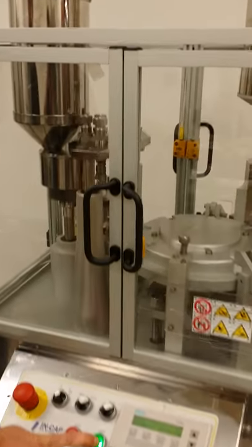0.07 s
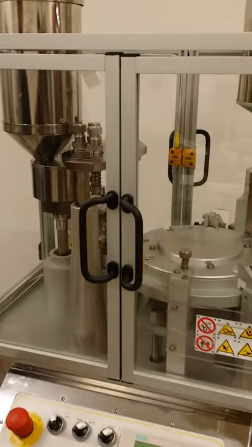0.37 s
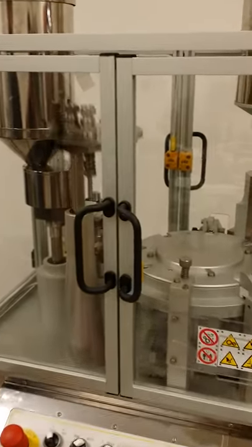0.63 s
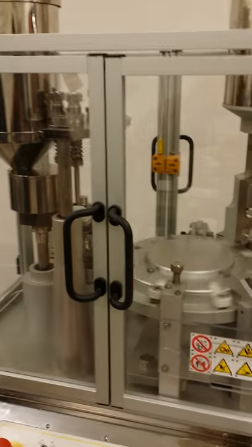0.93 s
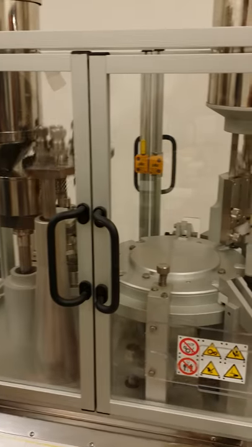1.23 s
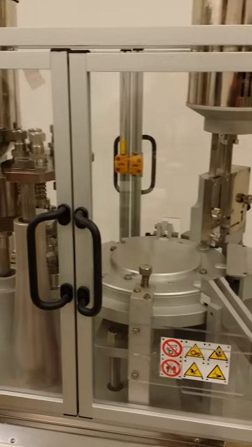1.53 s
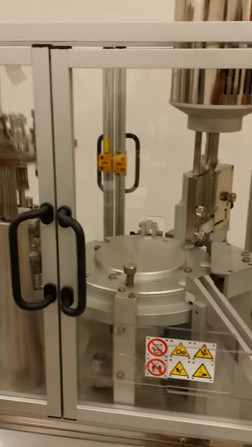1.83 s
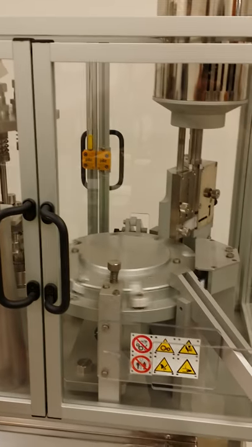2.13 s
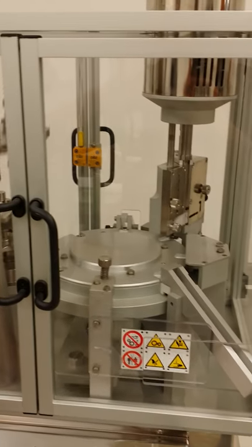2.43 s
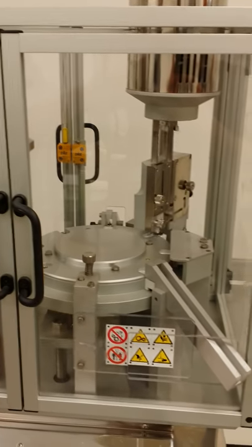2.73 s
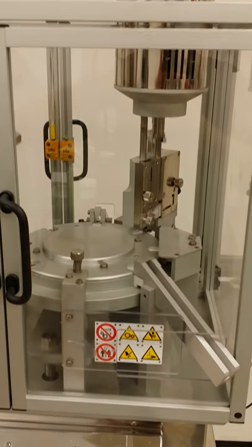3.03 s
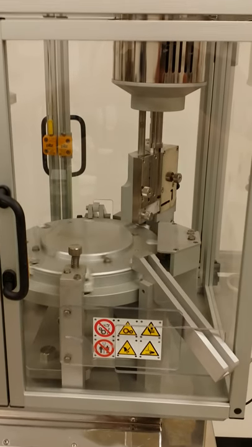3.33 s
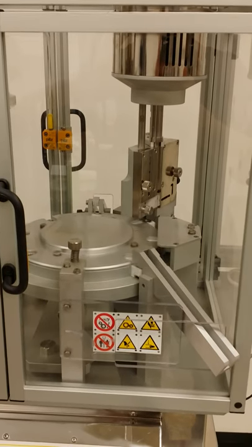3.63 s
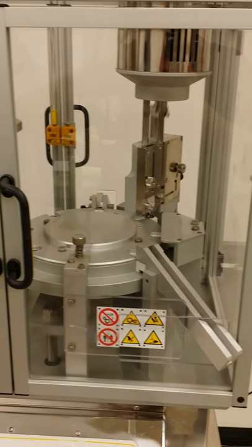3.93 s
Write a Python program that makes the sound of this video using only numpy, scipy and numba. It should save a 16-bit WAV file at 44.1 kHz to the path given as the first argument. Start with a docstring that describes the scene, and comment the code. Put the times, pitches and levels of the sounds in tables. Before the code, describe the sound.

A capsule filling machine runs close by in a workshop. Over a steady hum, rumble and airy hiss, it cycles three times: a metal clack and thump, a sharp air blast, then a puff, ticks and dull knocks.

```python
"""A capsule filling machine indexes every 1.29 s behind its doors, heard from close by in a workshop.
From the start a vacuum pump and motors hum, the cam drive rumbles and air lines hiss. In each cycle
metal clacks on a stop and the frame thumps; a valve lets out a sharp blast; a puff, a latch tick and
two knocks follow. The third blast, at 3 s, overloads the gain control, which backs off and creeps up."""
import sys
import numpy as np
from scipy import signal
from scipy.fft import rfft, irfft
from scipy.io import wavfile
from scipy.ndimage import uniform_filter1d, minimum_filter1d
from numba import njit

SR = 44100
rng = np.random.default_rng(int(sys.argv[2]) if len(sys.argv) > 2 else 0)


def output_pcm(signal):
    """Save a mono or channel-first signal as 16-bit PCM at the path in sys.argv[1].

    Samples are clipped to [-1, 1] before scaling.
    """
    pcm = np.clip(np.atleast_2d(signal).T, -1, 1) * 32767
    wavfile.write(sys.argv[1], SR, np.round(pcm).astype(np.int16))


N = 176400
HZ = np.arange(N // 2 + 1) * SR / N
TIME = np.arange(N) / SR
CYCLE_S, PUMP_HZ, MAINS_HZ = 1.287, 227.3, 59.52

# Harmonics of pump and motor: harmonic number, level/dB
PUMP_TONES = [(1, -38), (2, -46), (3, -36.5), (4, -45.5), (5, -47.5), (6, -63)]
MOTOR_TONES = [(3, -48.5), (6, -45), (14, -49)]
# Cam load, air flow, whistle and slide friction over one cycle: t/s, level/dB
LOAD_CYCLE = [(0.1, 1), (0.2, 1), (0.38, -4), (0.58, 3), (0.73, -3), (1.03, -4.5), (1.21, 0.5)]
FLOW_CYCLE = [(0.1, 2.5), (0.33, 4), (0.66, 0), (0.76, 1), (1.12, 1.8)]
WHISTLE_CYCLE = [(0.02, -0.5), (0.2, -22), (0.45, -5), (0.72, 1.5), (0.98, -1), (1.15, 0)]
RUB_CYCLE = [(0.0, 0), (0.08, 4.5), (0.17, -1), (0.27, -16), (0.5, -5), (1.1, -15), (1.21, -11.5)]
# Power spectral densities of the noises: f/Hz, level/dB in a 1 Hz band
DRIVE_PSD = [(38, -99), (52, -69), (85, -66.5), (120, -65), (200, -60.5), (400, -58.5), (580, -68.5),
             (850, -64.5), (1300, -66), (1800, -75), (3000, -80), (5200, -70), (8000, -91)]
RUB_PSD = [(1500, -79.5), (3200, -66.5), (4300, -73), (6000, -74.5), (7500, -74.5), (9500, -76.5)]
AIR_PSD = [(400, -76), (800, -69.5), (2000, -77), (3200, -77.5), (4500, -78.5), (7200, -71.5), (8600, -74),
           (10400, -67.5), (12200, -73.5), (13600, -64.5), (15300, -65)]
WHISTLE_PSD = [(1000, -96), (2700, -77), (3500, -75), (5500, -93), (9000, -86)]
KNOCK_PSD = [(60, -60), (190, -53.5), (500, -58.5), (1200, -50), (1700, -63), (2300, -56.5), (4000, -67.5),
             (9000, -78), (15000, -90)]
LATCH_PSD = [(400, -60), (1500, -63.5), (2300, -59.5), (5000, -60.5), (7000, -58), (15000, -58.5)]
CLACK_PSD = [(60, -62), (320, -47.5), (550, -63), (1100, -45.5), (1600, -65.5), (2800, -57.5),
             (4000, -53.5), (5200, -64), (7000, -53.5), (9000, -57), (10500, -62), (15000, -73)]
BLAST_PSD = [(300, -70), (1500, -60), (4000, -56), (6000, -54.5), (8700, -48), (10500, -45.5),
             (13000, -45.5), (15300, -47)]
EXHAUST_PSD = [(150, -75.5), (1500, -58.5), (3500, -63), (12000, -64.5), (15000, -63)]
PUFF_PSD = [(150, -104), (800, -57.5), (2000, -68), (9000, -64), (15000, -66)]
# Resonances in those spectra: f/Hz, width/Hz, lift/dB
DRIVE_PEAKS = [(173, 24, 11), (322, 6.1, 2.1)]
RUB_PEAKS = [(5200, 190, 5.1)]
AIR_PEAKS = [(7570, 240, 6.1), (9440, 200, 16.7)]
WHISTLE_PEAKS = [(3550, 180, 12.8)]
CLACK_PEAKS = [(1227, 180, 9.2), (1890, 600, 16), (4260, 210, 9.2), (8500, 540, 10.3)]
BLAST_PEAKS = [(7360, 820, 12.5), (11400, 960, 10), (15000, 460, 11.3)]
# Normal modes of frame, metal stop and valve body: f/Hz, level/dB, T60/s
FRAME_PARTIALS = [(129.4, -23.5, 0.16), (181.3, -19.5, 0.19), (251.5, -23, 0.1), (315.5, -17.5, 0.16),
                  (392, -24, 0.17)]
STOP_PARTIALS = [(981, -24, 0.29), (1221, -25.5, 0.11), (1883, -26, 0.25), (2020, -39, 0.2),
                 (2460, -21, 0.11)]
VALVE_PARTIALS = [(7267, -17.5, 0.27), (12000, -36, 0.067), (15130, -13, 0.16)]
# Knocks, clacks and puffs: t/s, level/dB
KNOCK_EVENTS = [(0.098, -3.5), (0.422, -0.5), (1.188, 1.5), (1.385, -6.5), (1.705, -5), (2.474, -1.5),
                (2.672, -12), (2.992, 3.5), (3.758, 0)]
CLACK_EVENTS = [(0.394, -3), (1.678, -1.5), (2.966, -1)]
PUFF_EVENTS = [(0.588, 2.5), (1.876, 3.5), (3.165, -2.5)]
# Latch ticks and their pitch: t/s, level/dB, f/Hz
LATCH_EVENTS = [(0.499, -3, 3130), (0.68, -0.5, 2600), (1.78, -2, 4150), (1.965, 0, 2790), (3.25, 1, 2440)]
# Frame thumps and air blasts: t/s, level/dB, spectral tilt/(dB per octave)
THUMP_EVENTS = [(0.03, -3, 1), (0.41, -2, 5), (0.483, 0, -3), (0.612, -0.5, -3), (1.061, -1.5, -4),
                (1.188, -4, -5), (1.697, -4.5, 8), (1.775, -3.5, 4), (1.891, -3, -1.5), (2.334, -3, -1),
                (2.477, -1, -5), (2.676, -3.5, -7), (2.981, 0, 3), (3.635, -5, 1)]
BLAST_EVENTS = [(0.451, -1.5, -5.5), (1.7374, -5, -1.5), (3.031, 1, 3.5)]
# Likeness of the two microphone ports: f/Hz, correlation (capped at 1 in use)
PORT_CORRELATION = [(125, 0.5), (260, 1.1), (520, 0.5), (1000, -0.36), (4000, -0.02)]
# Response of the weaker left port: f/Hz, level/dB
LEFT_RESPONSE = [(60, -4), (250, -4), (680, -5.5), (1200, -5.5), (2200, -4.5), (4500, -2), (6400, 0.5),
                 (7600, -8), (9400, -13.5), (11500, -12.5), (14500, -9.5)]


def undb(db):
    """Amplitude ratio of a level in decibels."""
    return 10 ** (np.asarray(db) / 20)


def on_freqs(points):
    """A curve interpolated over log frequency at every bin."""
    hz, value = np.array(points, float).T
    return np.interp(np.log(HZ + 1e-9), np.log(hz), value)


def on_cycle(points):
    """A curve periodic in the machine's cycle."""
    return np.interp(TIME, *np.array(points, float).T, period=CYCLE_S)


def wander(position):
    """Gaussian fluctuation with a new value at each whole step of position."""
    return np.interp(position, np.arange(8192), rng.standard_normal(8192))


def noise(spectrum, peaks=()):
    """Coloured noise; the ratio of sum to difference signal sets the correlation of the ports."""
    lift = 1 + sum((undb(db) ** 2 - 1) / (1 + (2 * (HZ - hz) / width) ** 2) ** 2
                   for hz, width, db in peaks)
    mid, side = rng.standard_normal((2, 2 * len(HZ))).view(complex)
    alike = np.clip(on_freqs(PORT_CORRELATION), -1, 1)
    ports = mid * np.sqrt(1 + alike) + side * np.sqrt(1 - alike) * np.array([[1], [-1]])
    return irfft(ports * undb(on_freqs(spectrum)) * np.sqrt(np.abs(lift) * SR * N / 2) / 2, N)


def bursts(events, attack_s, hold_s, t60_s, room_db, room_t60_s):
    """Envelope of incoherent events: direct sound and reverberant tail add in power."""
    age, power = TIME[:SR // 2], np.zeros(N + SR)
    decay = -2 * np.log(1000) * np.maximum(age - attack_s - hold_s, 0)
    tail = undb(room_db) ** 2 * np.exp(decay / room_t60_s)
    shape = np.clip(age / attack_s, 0, 1) ** 2 * (np.exp(decay / t60_s) + tail)
    for start, db in events:
        power[int(start * SR):][:len(age)] += undb(db) ** 2 * shape
    return np.sqrt(power[:N])


def ring(partials, attack_s=0.0005):
    """Damped free vibration of modes (t/s, f/Hz, level/dB, T60/s), out of step at the two ports."""
    age, out = TIME[:SR // 2], np.zeros((2, N + SR))
    for start, hz, db, t60_s in partials:
        detune, phase, lag = rng.standard_normal(3) * (.008, 1, .0002)
        turns = hz * (1 + detune) * (age - np.array([[lag], [0]])) + phase
        shape = np.minimum(age / attack_s, 1) * np.exp(-np.log(1000) * age / t60_s)
        out[:, int(start * SR):][:, :len(age)] += undb(db) * shape * np.sin(2 * np.pi * turns)
    return out[:, :N]


def chatter(rate_hz, depth_db):
    """Random amplitude modulation at unit mean power, as of uneven contact."""
    gain = undb(depth_db * wander(TIME * rate_hz))
    return gain / np.sqrt(np.mean(gain ** 2))


def hum(base_hz, tones, lag_s):
    """Rotation at a slightly wandering speed gives a harmonic series, delayed at the left port."""
    turns = np.cumsum(base_hz * (1 + 0.0018 * wander(TIME * 5))) / SR
    tone = np.sqrt(2) * sum(
        undb(db + 1.7 * wander(TIME * 12)) * np.sin(2 * np.pi * (k * turns + rng.random()))
        for k, db in tones)
    return np.array([np.interp(TIME - lag_s, TIME, tone), tone])


def motors():
    """Mains hum; two motors at slightly different speeds interfere, so its lowest tone beats."""
    period_s, dip_s, second_motor_db = 0.638, 0.652, -4
    beat = np.abs(1 - undb(second_motor_db) * np.exp(2j * np.pi * (TIME - dip_s) / period_s))
    return hum(MAINS_HZ, MOTOR_TONES, lag_s=0.00033) + beat * hum(2 * MAINS_HZ, [(1, -42)], lag_s=0)


def cabinet(sound):
    """Dense weak resonances of panes and frame ripple the spectrum of the noises inside."""
    steps = HZ / 26  # one ripple value every 26 Hz
    ripple = np.array([wander(steps) + .55 * wander(steps / 4) for _ in range(2)])
    depth_db = 2.1 * on_freqs([(300, 0.99), (1000, 1.02), (5000, 1.94), (12000, 0.085)])
    return irfft(rfft(sound) * undb(depth_db * (ripple - 0.71)), N)


def cam_drive():
    """Forced vibration: cams and bearings shake the frame as the load rises; the slides rub."""
    rumble = noise(DRIVE_PSD, DRIVE_PEAKS) * undb(on_cycle(LOAD_CYCLE)) * chatter(100, 2.0)
    rub = noise(RUB_PSD, RUB_PEAKS) * undb(on_cycle(RUB_CYCLE)) * chatter(180, 2.5)
    return rumble + rub


def air_lines():
    """Flow noise: a broadband hiss, and a narrowband whistle while the table dwells."""
    hiss = noise(AIR_PSD, AIR_PEAKS) * undb(on_cycle(FLOW_CYCLE) + 0.32 * wander(TIME * 25))
    whistle_db = on_cycle(WHISTLE_CYCLE) + 1.12 * TIME  # the microphone moves toward the whistle
    return hiss + noise(WHISTLE_PSD, WHISTLE_PEAKS) * undb(whistle_db) * chatter(120, 2.0)


def knocks():
    """Impacts of the slides radiate dull, quickly damped noise."""
    envelope = bursts(KNOCK_EVENTS, 0.0013, 0.0071, 0.14, room_db=-15, room_t60_s=0.63)
    return noise(KNOCK_PSD) * envelope * chatter(300, 3.5)


def latches():
    """Each latch impact excites a broad resonance and a clear ring at the same pitch."""
    ticks = sum(noise(LATCH_PSD, [(hz, 850, 6.5)]) * bursts([(t, db)], 0.00029, 0.0025, 0.11, -9.5, 0.3)
                for t, db, hz in LATCH_EVENTS)
    return ticks + ring([(t, hz, db - 23, 0.061) for t, db, hz in LATCH_EVENTS])


def thumps():
    """Blows excite the frame's low modes; each thump has its own tilt, duller or brighter."""
    pivot_hz = FRAME_PARTIALS[1][0]
    return ring([(t, hz, db + mode_db + tilt * np.log2(hz / pivot_hz), t60)
                 for t, db, tilt in THUMP_EVENTS for hz, mode_db, t60 in FRAME_PARTIALS], attack_s=0.016)


def clacks():
    """Metal strikes a stop: a broadband transient, then free vibration of the stop's modes."""
    envelope = bursts(CLACK_EVENTS, 0.00039, 0.01, 0.11, room_db=-14, room_t60_s=0.53)
    modes = [(t, hz, db + mode_db, t60) for t, db in CLACK_EVENTS for hz, mode_db, t60 in STOP_PARTIALS]
    return noise(CLACK_PSD, CLACK_PEAKS) * envelope + ring(modes)


def valves():
    """Jet noise: a valve cracks open and its body rings; the exhaust decays and a softer puff follows."""
    jet = rfft(noise(BLAST_PSD, BLAST_PEAKS))
    octaves = np.log2(np.maximum(HZ / 7000, 1))  # the tilt acts above 7 kHz
    crack = sum(irfft(jet * undb(tilt * octaves), N) * bursts([(t, db)], 0.00044, 0.0054, 0.035, -11, .26)
                for t, db, tilt in BLAST_EVENTS)
    body = ring([(t, hz, db + mode_db + tilt * np.log2(hz / VALVE_PARTIALS[0][0]), t60)
                 for t, db, tilt in BLAST_EVENTS for hz, mode_db, t60 in VALVE_PARTIALS])
    openings = [(t, 0) for t, _, _ in BLAST_EVENTS]
    exhaust = noise(EXHAUST_PSD) * bursts(openings, 0.0027, 0.021, 0.93, room_db=-20, room_t60_s=.7)
    puff = noise(PUFF_PSD) * bursts(PUFF_EVENTS, 0.0032, 0.019, 0.29, room_db=-29, room_t60_s=.45)
    return crack + body + (exhaust + puff) * chatter(300, 2.2)


def scene():
    """Superposition of all sources at the two ports, the left one less sensitive."""
    tones = hum(PUMP_HZ, PUMP_TONES, lag_s=0.00013) + motors()
    inside = cam_drive() + air_lines() + clacks() + thumps() + latches() + knocks() + valves()
    left, right = tones + cabinet(inside)
    return np.array([irfft(rfft(left) * undb(on_freqs(LEFT_RESPONSE)), N), right])


@njit
def follow_peaks(x, release_s):
    """Peak detection: instant rise, exponential release."""
    keep = np.exp(-1 / (release_s * SR))
    y, held = np.empty(len(x)), 0.
    for i in range(len(x)):
        held = max(x[i], held * keep)
        y[i] = held
    return y


def record(dry):
    """Compression: a look-ahead limiter ducks peaks; a slow gain control backs off after an overload."""
    limit_db, limit_share, ahead = -13.5, 0.34, int(0.01 * SR)
    back_off_db, back_off_s = 15.5, 0.11
    power = uniform_filter1d((dry ** 2).max(axis=0), 256)
    level_db = 10 * np.log10(np.abs(power) + 1e-12)
    excess_db = -minimum_filter1d(-np.maximum(level_db - limit_db, 0), ahead)
    duck_db = limit_share * uniform_filter1d(follow_peaks(excess_db, release_s=0.028), ahead)
    overload = follow_peaks(np.clip(level_db, 0, 1), release_s=1.52)  # sets in above 0 dB
    step = 1 / (back_off_s * SR)
    for _ in range(2):
        overload = signal.lfilter([step], [1, step - 1], overload)
    out = signal.sosfilt(signal.butter(4, 44, "high", fs=SR, output="sos"), dry)
    out = np.clip(out * undb(-duck_db - back_off_db * overload), -1, 1)
    return signal.sosfilt(signal.ellip(10, .2, 70, 15550, "low", fs=SR, output="sos"), out)


dry = scene()
out = record(dry)
output_pcm(out)
```